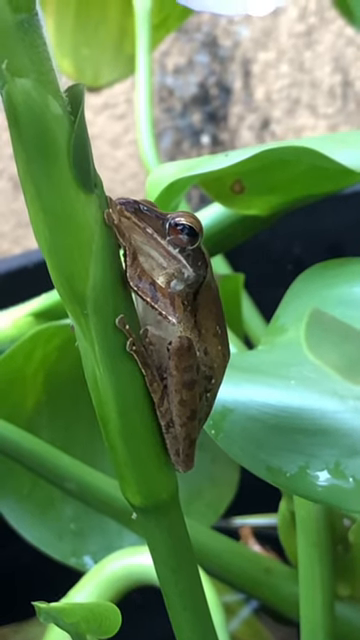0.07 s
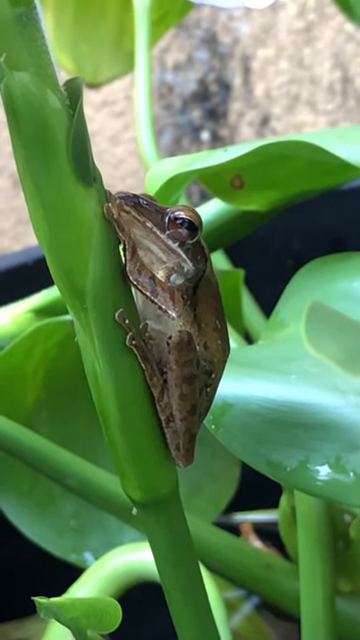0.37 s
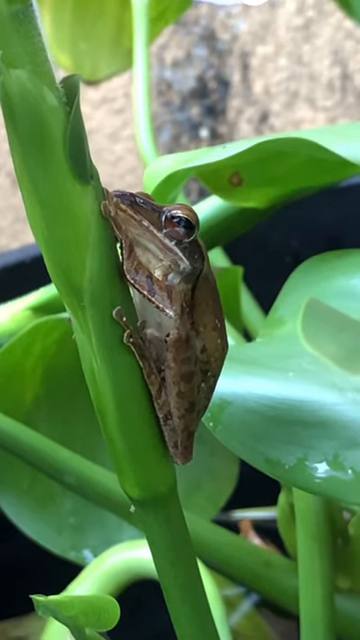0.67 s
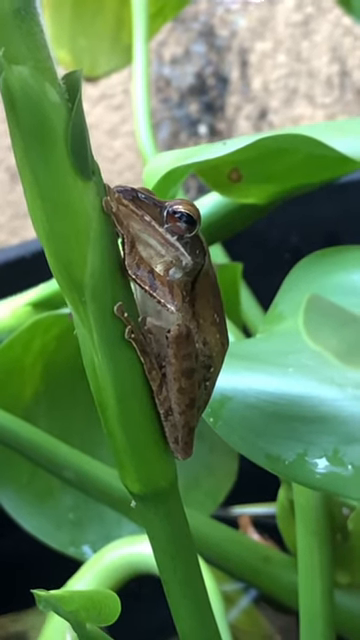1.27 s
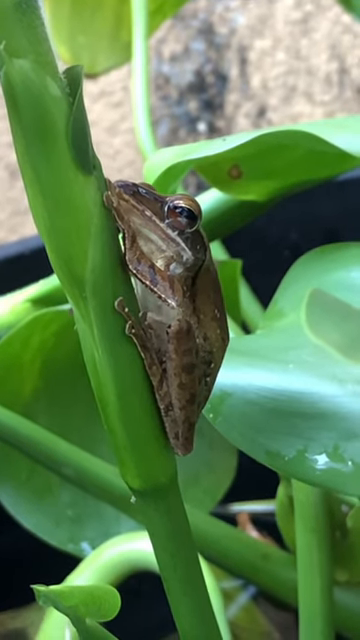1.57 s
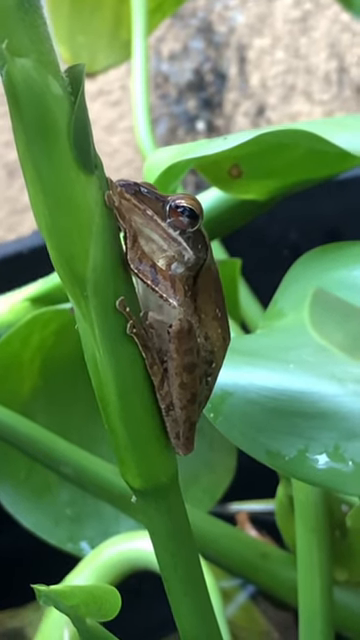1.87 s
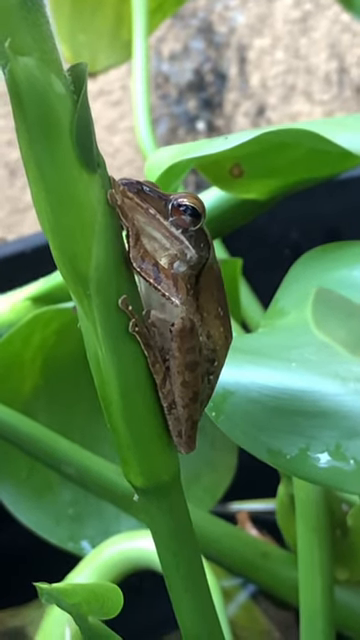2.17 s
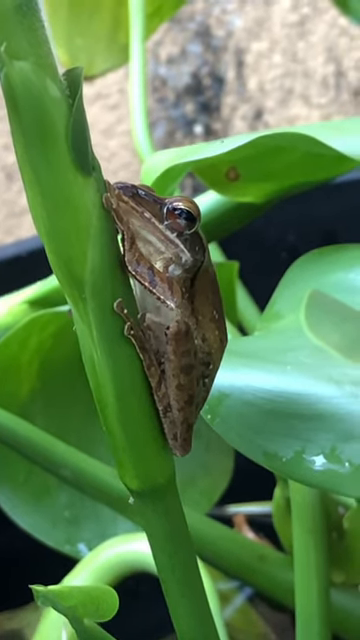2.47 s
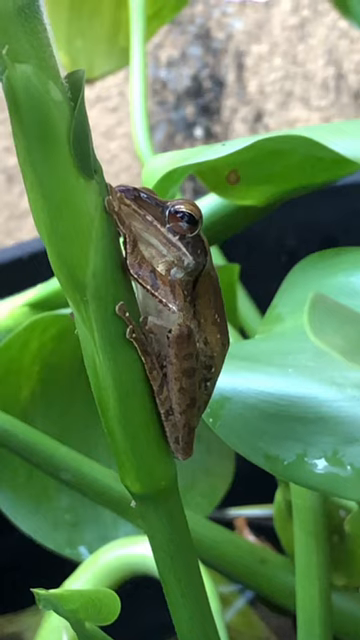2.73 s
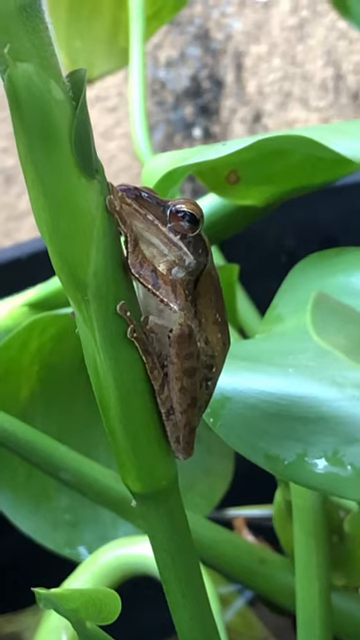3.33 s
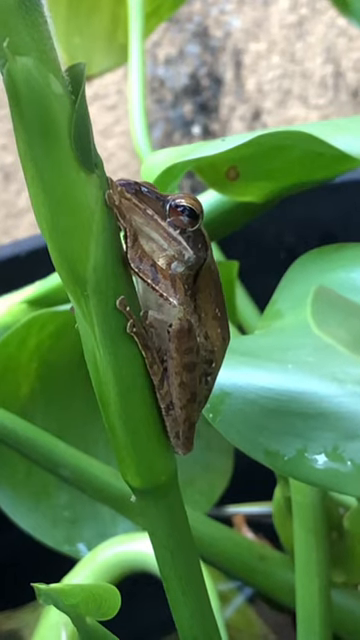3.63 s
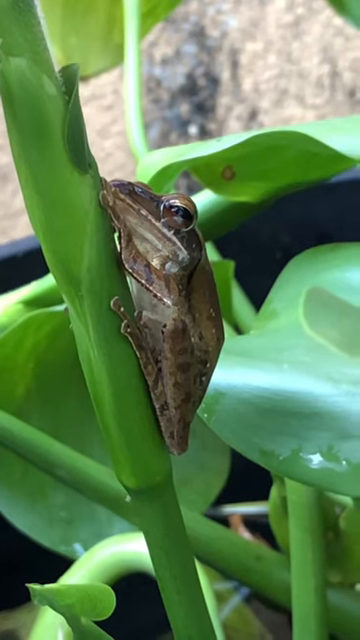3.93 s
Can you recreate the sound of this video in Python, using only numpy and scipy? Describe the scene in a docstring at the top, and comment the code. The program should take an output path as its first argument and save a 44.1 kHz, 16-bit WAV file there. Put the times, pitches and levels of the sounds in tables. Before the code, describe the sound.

Distant traffic rumbles throughout, heard from a garden, with a low engine drone that dips briefly near 2.8 seconds. One faint, high insect buzzes steadily while another swells about once a second. Soft rustles and ticks come from close by, with faint scratchy chirps around 1.5, 2.1 and 2.9 seconds. A nearer vehicle's rumble and tyre hiss build gradually, loudest from 3 to 4 seconds.

```python
"""A garden with traffic some way off. From the start an engine drones low over the road's rumble, slowly
losing speed; one insect buzzes steadily, another in swelling phrases. Soft rustles and ticks sound close
by, joined from about 1.5 s by scratchy chirps. Near 2.8 s the drone dips briefly. The rumble and tyre
hiss of a nearer vehicle, swelling all along, are loudest in the last second."""
import sys
import numpy as np
from scipy import signal
from scipy.fft import rfft, irfft
from scipy.io import wavfile

SR = 44100
rng = np.random.default_rng(int(sys.argv[2]) if len(sys.argv) > 2 else 0)


def store_wav(level_fs):
    """Save 16-bit WAV to argv[1]."""
    pcm = np.round(np.clip(np.atleast_2d(level_fs), -1, 1) * 32767)
    wavfile.write(sys.argv[1], SR, pcm.T.astype(np.int16))


N = 176400

# Far road noise. Each row: frequency in Hz, density in dB per Hz before the road gain.
ROAD_SPECTRUM = [(20, -92), (30, -78), (42, -66), (60, -58.5), (100, -62), (130, -69), (190, -66),
                 (260, -71), (420, -79), (640, -79), (1080, -76.5), (1500, -87), (2000, -95.5),
                 (3000, -102.5), (4200, -109.5), (6000, -110.5), (8500, -116), (11000, -120), (16000, -121)]
# Tyre song. Each row: centre in Hz, width in Hz, level in dB before the road gain.
TYRE_BANDS = [(527, 88, -61.5), (720, 54, -55.5), (797, 48, -60.5), (903, 71, -60.5), (984.6, 52, -55.5)]
# Each row: time in seconds, gain in dB.
ROAD_GAIN_DB = [(0, 0), (.6, -1.5), (1.3, 1), (2.2, -0.5), (3, -0.5), (4, 0)]

# Small close sounds. Each row: start in seconds, peak level in dB, decay in seconds.
RUSTLES = [(.07, -70, .09), (.17, -73, .06), (1.05, -74, .03), (1.5, -75, .1), (2.52, -70, .08),
           (2.9, -73, .05)]
TICKS = [(.877, -72, .002), (1.878, -68, .002), (1.917, -69, .002), (2.882, -71, 0.0019)]
CHIRPS = [(1.452, -64, 0.016), (1.487, -59, .03), (1.555, -68, .05), (2.135, -73, 0.037),
          (2.89, -63, 0.036)]
# Their spectra. Each row: frequency in Hz, relative density in dB.
RUSTLE_SPECTRUM = [(1000, -19), (3000, 7), (6000, -1), (10000, -3), (16000, -9)]
TICK_SPECTRUM = [(4000, -20), (11000, -8), (14000, 0), (16000, -2)]
CHIRP_SPECTRUM = [(1800, -20), (2800, -3), (3400, 7), (4500, -6), (7500, -15), (10000, -26), (16000, -35)]

# Insect wing resonances. Each row: centre in Hz, width in Hz, relative level in dB.
STEADY_WINGS = [(9160, 350, 0.5), (9420, 290, -1.5)]
PHRASE_WINGS = [(7480, 150, -1), (7720, 360, 0)]
# Insect phrases. Each row: end in seconds, length in seconds, peak level in dB.
PHRASES = [(0.036, .6, -73), (1.204, 0.7, -75), (2.362, 0.55, -74.5), (3.567, 0.7, -75)]

# Nearer vehicle, body and tyres. Each row: frequency in Hz, density in dB per Hz before its gain.
RUMBLE_SPECTRUM = [(25, -95), (70, -69.5), (98, -55), (122, -68.5), (180, -69), (290, -72), (450, -73),
                   (570, -70.5), (660, -76), (900, -78), (1300, -86), (2500, -115)]
HISS_SPECTRUM = [(300, -104), (900, -81.5), (1400, -86), (2000, -89.5), (3000, -95), (4200, -103),
                 (6000, -104), (8500, -112), (11000, -115.5), (16000, -116.5)]
# Body boom. Each row: centre in Hz, width in Hz, level in dB before the rumble gain.
BOOM_BANDS = [(327, 52, -50.5), (541, 81, -52.5)]
# Each row: time in seconds, gain in dB.
RUMBLE_GAIN_DB = [(0, -17.5), (.9, -11), (1.35, -6.5), (1.65, -6), (2.1, -5.5), (2.75, -2), (3.3, -1.5),
                  (4, -1.5)]
HISS_GAIN_DB = [(0, -24), (.6, -11), (1.2, -11), (2.3, -6), (2.8, -5), (3.15, -2), (3.45, 0.5), (3.7, -2),
                (3.9, 1.5), (4, -2)]

# Engine speed. Each row: time in seconds, firing rate in Hz.
FIRING_HZ = [(0, 70.5), (.25, 69), (.8, 69.1), (1.05, 68.2), (1.95, 67.74), (2.2, 66.88), (2.6, 67.32),
             (3.1, 66.37), (3.6, 66.52), (4, 66.44)]
# Exhaust overtones. Each row: multiple of the firing rate, relative level in dB.
OVERTONES = [(2, -3), (3, -13), (4, -13), (5, -15), (8, -23)]
# Firing tone and overtones. Each row: time in seconds, gain in dB.
DRONE_GAIN_DB = [(0, -32.5), (.12, -34), (.22, -30), (.65, -31), (.86, -35), (1.05, -33), (1.28, -31.5),
                 (1.42, -35.5), (1.5, -31.5), (1.78, -29.5), (2.1, -32.5), (2.46, -37.5), (2.58, -43),
                 (2.78, -51), (3.02, -34.5), (3.6, -35.5), (3.73, -40), (3.92, -32)]
OVERTONE_GAIN_DB = [(0, -45), (.75, -54), (1.3, -48.5), (2.3, -47), (2.65, -41.5), (3.3, -43.5),
                    (3.48, -51), (3.72, -40.5), (4, -44.5)]


def from_db(db):
    """Decibels to gain."""
    return 10 ** (np.asarray(db) / 20)


def curve(rows):
    """Linear interpolation, one value per sample."""
    return np.interp(np.arange(N) / SR, *np.transpose(rows))


def unit_rms(x):
    """Scale to unit rms."""
    return x / np.sqrt(np.mean(x ** 2) + 1e-30)


def bins_hz():
    """Bin frequencies, floored at 1 Hz."""
    return np.maximum(np.arange(N // 2 + 1) * SR / N, 1)


def noise(spectrum):
    """Noise with the given density in dB per Hz."""
    hz, db = np.transpose(spectrum)
    gain = from_db(np.interp(np.log(bins_hz()), np.log(hz), db))
    return irfft(rfft(rng.standard_normal(N)) * gain, N) * np.sqrt(SR / 2)


def drift(corner_hz):
    """Slow random wander, unit rms."""
    rolloff = (1 + (bins_hz() / corner_hz) ** 2) ** 2
    return unit_rms(irfft(rfft(rng.standard_normal(N)) / rolloff, N))


def resonate(x, hz, width_hz):
    """Steep-sided resonance, unit rms."""
    sos = signal.butter(2, [hz - width_hz / 2, hz + width_hz / 2], "band", fs=SR, output="sos")
    return unit_rms(signal.sosfilt(sos, x))


def far_road(waver_db=2.5):
    """Steady wash of far traffic; tyres sing in narrow, wavering bands."""
    song = sum(from_db(db + waver_db * drift(6)) * resonate(rng.standard_normal(N), hz, width_hz)
               for hz, width_hz, db in TYRE_BANDS)
    return from_db(curve(ROAD_GAIN_DB)) * (noise(ROAD_SPECTRUM) + song)


def bursts(rows, spectrum, attack_s):
    """Rustles, ticks or chirps: noise with a linear rise and exponential decay."""
    t = np.arange(N) / SR
    envelope = np.zeros(N)
    for start_s, db, decay_s in rows:
        rise = np.clip((t - start_s) / attack_s, 0, 1)
        fall = np.exp(-np.maximum(t - start_s - attack_s, 0) / decay_s)
        envelope += from_db(db) * rise * fall
    return envelope * unit_rms(noise(spectrum))


def wing_buzz(wings, stroke_hz, depth, jitter):
    """Each stroke scrapes a puff of noise into the wing resonances; unit rms."""
    phase = 2 * np.pi * np.cumsum(stroke_hz * (1 + jitter * drift(6.1))) / SR
    scrape = rng.standard_normal(N) * np.exp(depth * np.cos(phase))
    return unit_rms(sum(from_db(db) * resonate(scrape, hz, width_hz) for hz, width_hz, db in wings))


def steady_insect(level_db=-79, waver_db=1.5):
    """Unbroken wing buzz, wavering slightly in level."""
    gain = from_db(level_db + waver_db * drift(13))
    return gain * wing_buzz(STEADY_WINGS, stroke_hz=87.5, depth=0.22, jitter=0.012)


def phrasing_insect(release_s=0.031):
    """Wing buzz in phrases that swell almost linearly, then break off."""
    t = np.arange(N) / SR
    envelope = np.zeros(N)
    for end_s, length_s, db in PHRASES:
        swell = np.clip((t - end_s + length_s) / length_s, 0, 1) ** 0.96
        release = np.exp(-np.maximum(t - end_s, 0) / release_s)
        envelope += from_db(db) * swell * release
    return envelope * wing_buzz(PHRASE_WINGS, stroke_hz=184, depth=0.5, jitter=0.0177)


def nearer_vehicle():
    """Body rumble and boom swell first, tyre hiss peaks later."""
    boom = sum(from_db(db) * resonate(rng.standard_normal(N), hz, width_hz)
               for hz, width_hz, db in BOOM_BANDS)
    body = from_db(curve(RUMBLE_GAIN_DB)) * (noise(RUMBLE_SPECTRUM) + boom)
    hiss = from_db(curve(HISS_GAIN_DB)) * noise(HISS_SPECTRUM)
    return body + hiss


def engine(speed_wobble=0.0046, drone_flutter_db=0.3, overtone_flutter_db=4):
    """Far exhaust: a strong firing tone and weak overtones, each fluttering on its way."""
    firing_hz = curve(FIRING_HZ) * (1 + speed_wobble * drift(13.6))
    phase = 2 * np.pi * np.cumsum(firing_hz) / SR
    drone = from_db(curve(DRONE_GAIN_DB) - drone_flutter_db * drift(33)) * np.sin(phase)
    overtones = np.zeros(N)
    for multiple, db in OVERTONES:
        gain = from_db(db + overtone_flutter_db * drift(4.3))
        overtones += gain * np.sin(multiple * phase + 2 * np.pi * rng.random())
    return np.sqrt(2) * (drone + from_db(curve(OVERTONE_GAIN_DB)) * overtones)


def scene():
    """Traffic, insects and small close sounds, in mono."""
    chirps = bursts(CHIRPS, CHIRP_SPECTRUM, attack_s=0.003)
    rustles = bursts(RUSTLES, RUSTLE_SPECTRUM, attack_s=0.025)
    ticks = bursts(TICKS, TICK_SPECTRUM, attack_s=0.001)
    traffic = engine() + far_road() + nearer_vehicle()
    insects = steady_insect() + phrasing_insect()
    return (traffic + insects + chirps + rustles + ticks)[None]


def record(dry):
    """Steep low-pass on the top treble."""
    cutoff_hz = 15720
    return signal.sosfilt(signal.ellip(12, 0.1, 70, cutoff_hz, fs=SR, output="sos"), dry)


dry = scene()
out = record(dry)
store_wav(out)
```